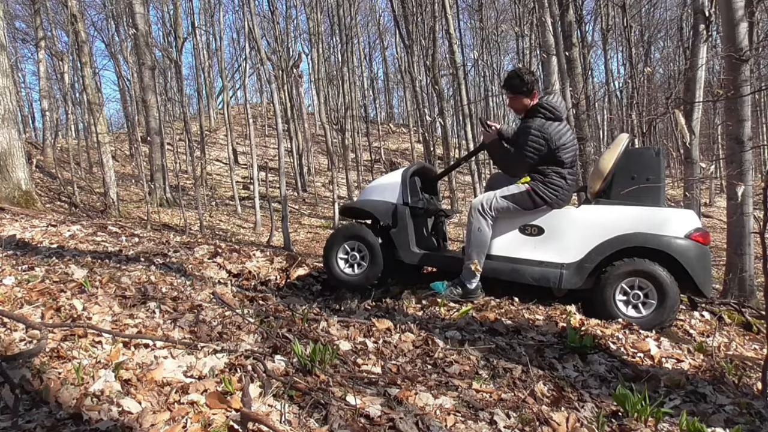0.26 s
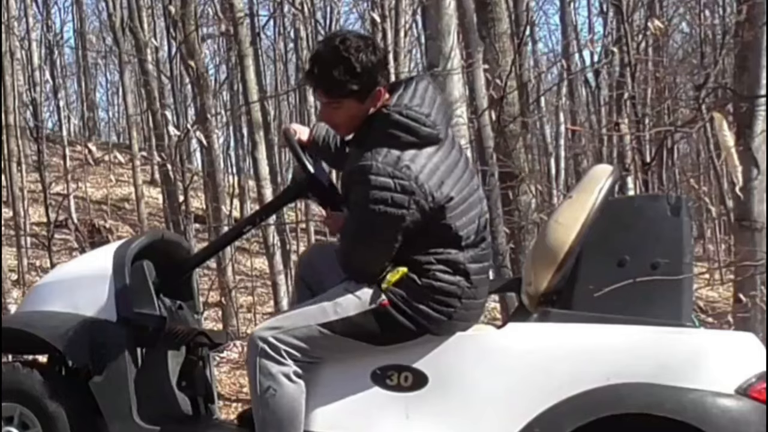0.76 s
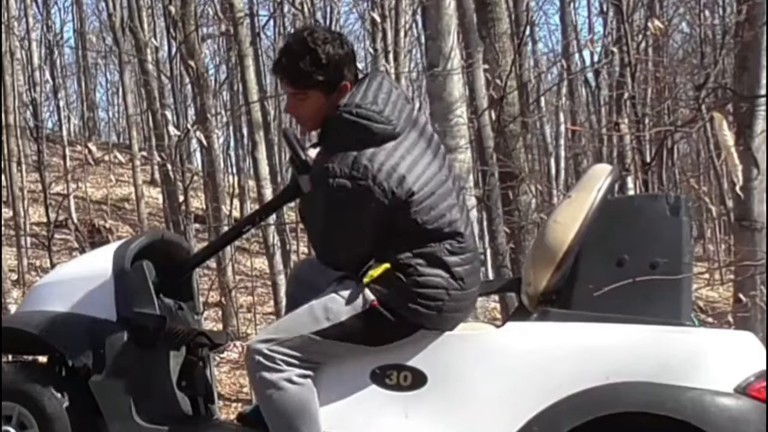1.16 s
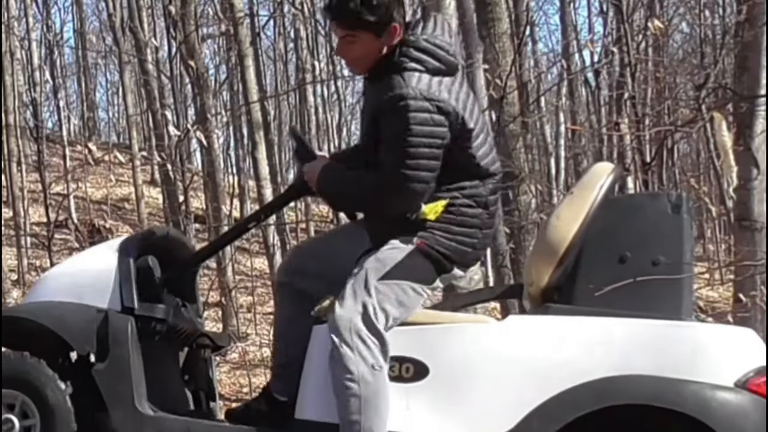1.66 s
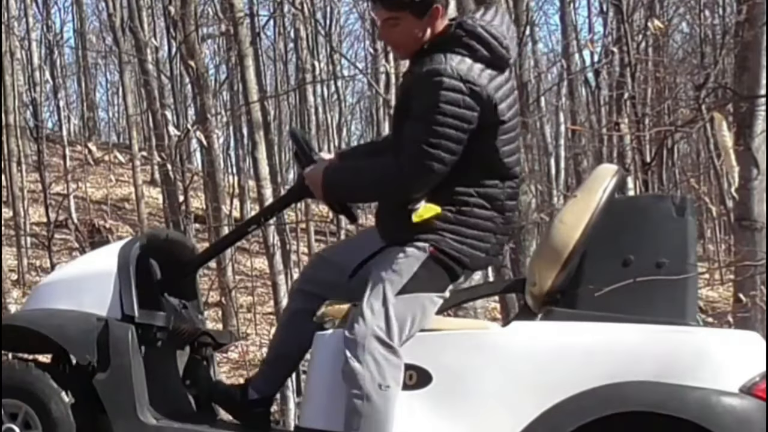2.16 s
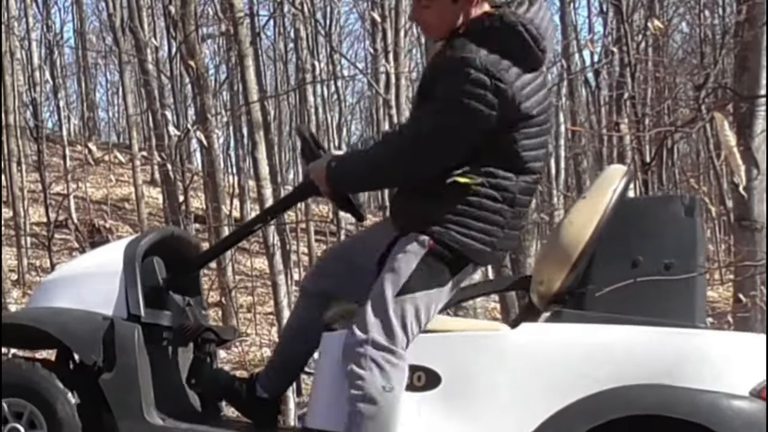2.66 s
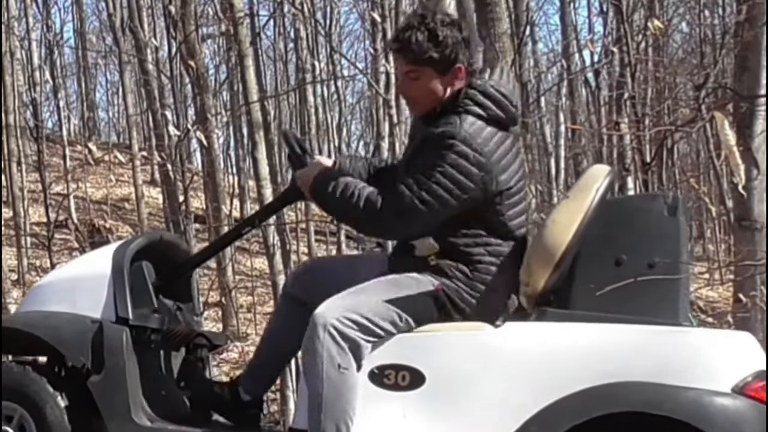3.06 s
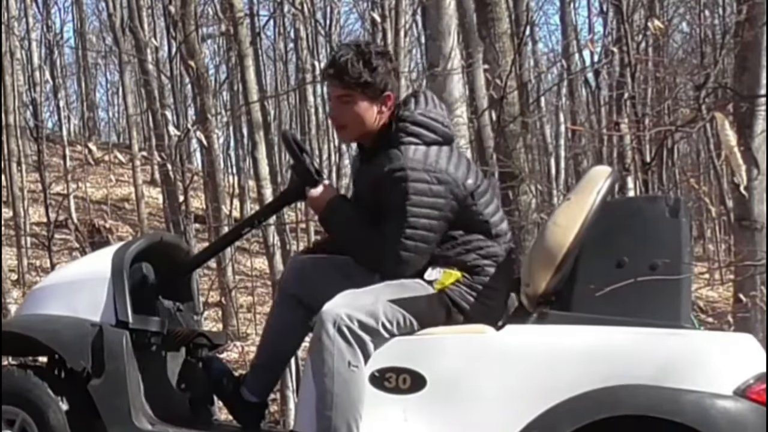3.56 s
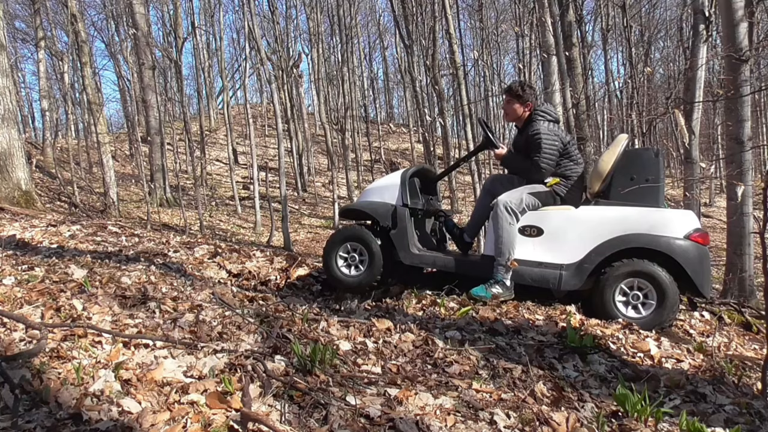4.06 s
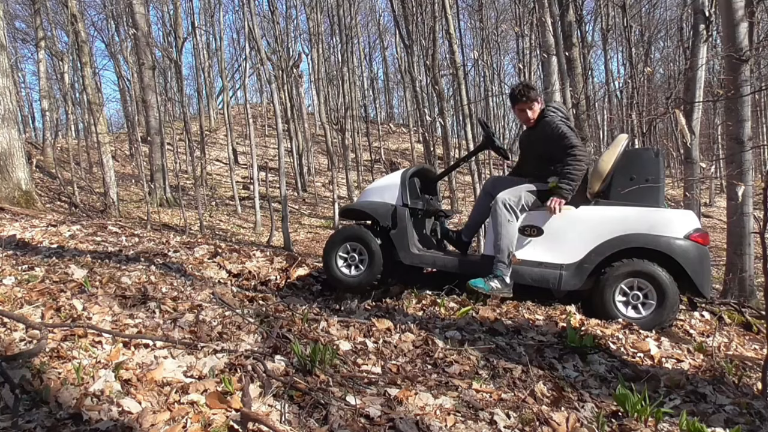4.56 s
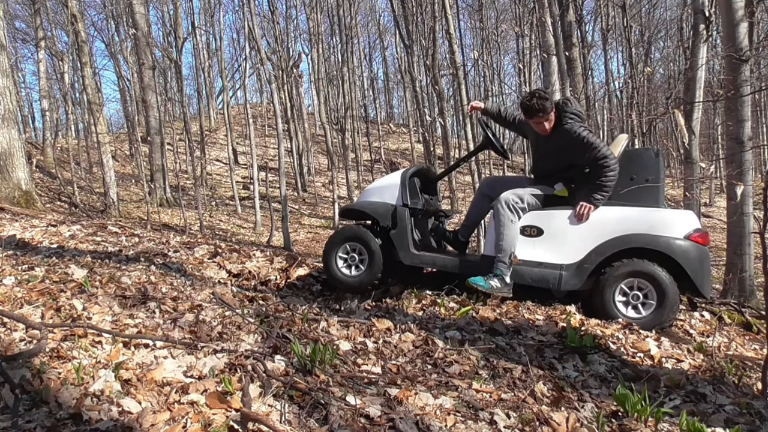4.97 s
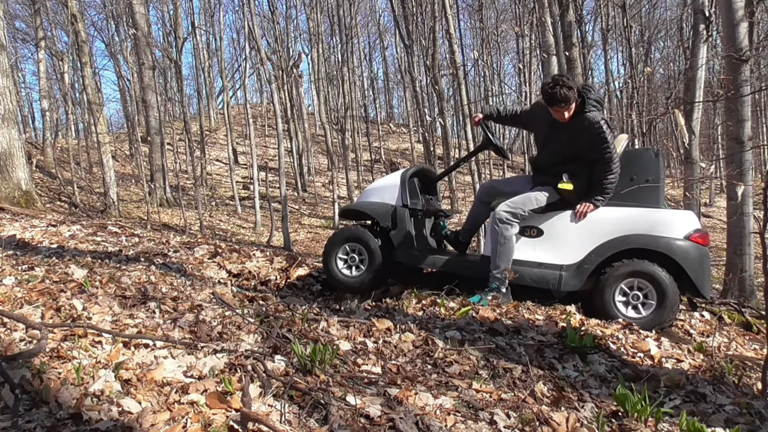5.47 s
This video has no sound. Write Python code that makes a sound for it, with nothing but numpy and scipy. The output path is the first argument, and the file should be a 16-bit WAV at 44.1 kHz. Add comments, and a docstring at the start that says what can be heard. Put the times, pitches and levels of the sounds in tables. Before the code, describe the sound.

In a quiet wood, a driver in a nylon jacket shifts on an electric cart: swishing cloth, soft knocks, a heavy triple-contact seat thud with loose panel slap, then a sharp pedal clack. More thumps, creaks and clicks follow, and a tiny hinge chirp. Finally the motor whines up into a growl with gear grind, tyre bumps and crackling dry leaves. Close, dry stereo microphone, faint hush behind.

```python
"""An electric golf cart in a quiet wood: its driver, in a nylon jacket, shifts onto the seat, then it sets off.
Cloth sounds are shaped noise under swells; thumps, slaps, clicks and clacks are decaying impacts.
A hinge chirps once, a gliding tone. The motor then whines up into a growl, a sum of shaft harmonics
shaped by housing resonances, over gear and tyre noise, rustling dry leaves and bumps of the wheels.
Beneath lie a faint hush of the wood and, later, a faint low rumble of the microphone itself."""
import sys
import numpy as np
from scipy import signal
from scipy.fft import rfft, irfft, next_fast_len
from scipy.io import wavfile

SR = 44100
rng = np.random.default_rng(int(sys.argv[2]) if len(sys.argv) > 2 else 0)


def int16_out(signal):
    """Quantize to a 16-bit WAV file."""
    q = np.round(np.clip(np.atleast_2d(signal).T, -1, 1) * 32767)
    wavfile.write(sys.argv[1], SR, q.astype(np.int16))


N = 251754
TIME = np.arange(N) / SR
AGE = TIME[:SR // 3]   # time since a blow, in seconds


def from_db(db):
    """Level: 20 dB is a factor of ten in amplitude."""
    return 10 ** (np.asarray(db) / 20)


def rms_one(x):
    """Normalization to unit effective value."""
    return x / np.sqrt(np.mean(x ** 2) + 1e-20)


def peak_one(x):
    """Normalization to unit peak."""
    return x / (np.abs(x).max() + 1e-12)


def at_hz(points, hz):
    """Interpolation of a spectrum on a log-frequency axis."""
    return np.interp(np.log(hz), np.log(np.array(points)[:, 0]), np.array(points)[:, 1])


def add(out, s, sound):
    """Superposition: mix a short sound in at time s."""
    i = max(round(s * SR), 0)
    out[..., i:i + sound.shape[-1]] += sound[..., :N - i]


def ramp(start, length):
    """Linear onset: goes from 0 to 1 over length seconds and stays there."""
    return np.clip((TIME - start) / length, 0, 1)


def drift(rate, size=N):
    """Slow random modulation: interpolated chance with about rate knots a second and rms 1."""
    knots = rng.standard_normal(N // 20)
    return rms_one(np.interp(TIME[:size] * rate + 2, np.arange(len(knots)), knots))


SWELL_DB = 20   # depth of a swell over its rise or fall time


def swells(rows):
    """Power addition of swells (s, dB, rise s, fall s), each exponential: it rises and falls evenly in dB."""
    power = np.zeros(N)
    for s, db, rise, fall in rows:
        away = np.maximum((s - TIME) / rise, (TIME - s) / fall)
        power += from_db(db - SWELL_DB * np.minimum(away, 10)) ** 2
    return np.sqrt(power)


def resonate(x, hz, width):
    """Simple resonance: a two-pole filter with gain 1 on top."""
    r = np.exp(-np.pi * width / SR)
    numerator = np.array([1, 0, -1]) * (1 - r * r) / 2
    return signal.lfilter(numerator, [1, -2 * r * np.cos(2 * np.pi * hz / SR), r * r], x)


def struck(modes, scatter_db):
    """Modal superposition: one blow rings all modes, each with a strength that depends on where it lands."""
    hz, db, t60 = np.transpose(modes)[:, :, None]
    strength = from_db(db + scatter_db * rng.standard_normal(hz.shape))
    strength = strength * (-1) ** np.arange(len(hz))[:, None]   # neighbours move in opposite phase
    return np.sum(strength * from_db(-60 * AGE / t60) * np.sin(2 * np.pi * hz * AGE), axis=0)


# Likeness of the two channels for close sounds. Each row: frequency in Hz, correlation from 0 to 1.
LIKENESS = [(30, 0.55), (70, 0.96), (200, 0.97), (1000, 0.87), (4500, 1), (7000, 0.92), (10000, 0.39),
            (15000, 1)]


def noise(spectrum, grain_db=0., likeness=LIKENESS):
    """Band synthesis of coloured stereo noise, rms 1; grain_db breaks it into tiny snaps of uneven size."""
    white = rng.standard_normal((2, 2, N)) * from_db(grain_db * drift(1400))
    out = np.zeros((2, N))
    edges = np.geomspace(22, 17000, 27)
    for k, (low, high) in enumerate(zip(edges, edges[1:])):
        hz = np.sqrt(low * high)
        if spectrum[0][0] <= hz <= spectrum[-1][0]:
            band = signal.butter(2, [low, high], "band", fs=SR, output="sos")
            mid_side = signal.sosfilt(band, white[k % 2])   # neighbouring bands are independent
            alike = np.clip(at_hz(likeness, hz), -1, 1)
            out += from_db(at_hz(spectrum, hz)) * np.sqrt([[1 + alike], [1 - alike]]) * mid_side
    mid, side = out
    return rms_one(np.array([mid + side, mid - side]))


# Colour of the wood. Each row: frequency in Hz, relative density in dB per Hz.
WOODS = [(15, -39), (25, -11), (223, -3), (285, 9), (326, -52), (560, 3.5), (1100, -6), (1520, -11.5),
         (1840, -58), (3430, -15), (4490, -20), (4870, -16.5), (6210, -26.5), (10100, -14.5), (16000, -27)]
# Channel likeness of the diffuse wood. Each row: frequency in Hz, correlation.
DIFFUSE = [(30, 0.52), (200, 0.046), (4000, 0.6), (8000, 0.31)]


def woods(level_db=-58.5):
    """Diffuse field: steady noise whose channels are only partly correlated."""
    return from_db(level_db) * noise(WOODS, likeness=DIFFUSE)


# Strokes of the sleeve over the jacket.
# Each row: time of fastest slide in seconds, level in dB before flutter, rise in seconds, fall in seconds.
STROKES = [(0.12, -40, 0.073, 0.21), (0.56, -59.5, 0.72, 0.3), (0.695, -47, 0.12, 0.037),
           (0.935, -47, 0.14, 0.074), (1.16, -47.5, 0.08, 0.16), (1.35, -42, 0.22, 0.1),
           (1.65, -51, 0.44, 0.13), (1.83, -44, 0.22, 0.15), (2.03, -54, 0.71, 0.25),
           (2.19, -36.5, 0.16, 0.12), (2.42, -51.5, 0.96, 0.99), (2.69, -52, 0.079, 0.2),
           (2.905, -39, 0.14, 0.13), (3.17, -51.5, 0.46, 0.22), (3.37, -50, 0.55, 0.16),
           (3.62, -64, 0.14, 0.23), (3.937, -56, 0.059, 0.049)]
# Shifts of weight that drag cloth over the cushion.
# Each row: time of strongest drag in seconds, level in dB before flutter, rise in seconds, fall in seconds.
SHIFTS = [(0.0, -39, 0.51, 0.31), (0.945, -47.5, 0.081, 0.16), (1.352, -47, 0.03, 0.067),
          (1.66, -42, 0.31, 0.52), (2.2, -34.5, 0.22, 0.26), (2.82, -43.5, 0.41, 0.18),
          (3.25, -42, 0.78, 0.46), (4.42, -49, 0.081, 0.13)]
# Colours of ribbed nylon and of the cushion. Each row: frequency in Hz, relative density in dB per Hz.
NYLON = [(530, -6), (900, -5), (1100, -5), (1290, -5.5), (1680, -14.5), (2020, -9), (2760, -13.5),
         (3770, -10.5), (4200, -8), (7140, -8.5), (11400, -1), (13700, -34.5), (16000, -58)]
CUSHION = [(29, -63), (50, -12), (75, -9), (108, -4.5), (172, 7), (246, -0.5), (724, -8.5), (1000, -16),
           (1320, -16), (3000, -28.5), (3900, -43), (6600, -120)]
SITTING_DB, SETTLE_DB_PER_S = -57.5, -0.4   # the steady rub of cloth, fading as he settles


def jacket(flutter_db=1.8):
    """Sliding friction: nylon hisses as its ribs slide over each other; the cushion adds a dull rub."""
    dragging = np.hypot(swells(SHIFTS), from_db(SITTING_DB + SETTLE_DB_PER_S * TIME))
    swish = swells(STROKES) * from_db(flutter_db * drift(90)) * noise(NYLON, grain_db=1.5)
    rub = dragging * from_db(drift(60)) * noise(CUSHION, grain_db=3.5)
    return swish * from_db([[-.8], [.8]]) + rub   # the swish leans to the right


# Short hissing scrapes and brushes: first a zip-like scrape, then cloth, last a shoe scuff.
# Each row: time in seconds, level in dB, rise in seconds, fall in seconds, centre of the hiss in Hz.
SCRAPES = [(0.016, -43, 0.058, 0.027, 3800), (3.915, -57, 0.01, 0.038, 4840),
           (4.355, -61, 0.02, 0.033, 4860), (4.453, -58, 0.036, 0.038, 4800),
           (4.55, -66, 0.01, 0.037, 4900), (4.71, -59, 0.2, 0.14, 4700)]


def scrapes(width_share=0.67):
    """Broad resonance of friction noise: short hisses of a zip-like scrape, cloth and a shoe scuff."""
    out = np.zeros(N)
    for *swell, hz in SCRAPES:
        width = width_share * hz
        hiss = resonate(resonate(rng.standard_normal(N), hz, width), hz, width)
        out += swells([swell]) * rms_one(hiss)
    return out


# Loose panels slapping. Each row: start in seconds, level in dB before the trim, ring pitch in Hz.
SLAPS = [(0.021, -29, 430), (0.807, -43, 706), (1.514, -50, 820), (1.537, -38, 870), (1.598, -33, 900),
         (1.674, -23.5, 760), (1.68, -17.5, 920), (1.686, -22, 526), (2.238, -23, 755), (2.245, -16, 567),
         (2.582, -38, 625), (2.745, -41, 900), (2.794, -43, 920), (2.95, -46, 700), (3.119, -41, 1350),
         (3.161, -29, 615), (4.441, -50, 1780), (4.451, -46, 750)]


def slaps(trim_db=1.5, t60=0.047, width_hz=480, taps_per_s=650, buzz_db=-22):
    """Repeated impact: a loose panel hits its frame, then chatters against it in uneven, dying taps."""
    out = np.zeros(N)
    for s, db, hz in SLAPS:
        taps = rng.random(len(AGE)) < taps_per_s / SR
        chatter = rng.standard_normal(len(AGE)) * (taps + from_db(buzz_db)) * from_db(-60 * AGE / t60)
        chatter[0] = 2   # the first hit
        ring = resonate(resonate(chatter, hz, width_hz), hz, 2 * width_hz)
        add(out, s, from_db(db + trim_db) * peak_one(ring))
    return out


# Single knocks of hands and feet on seat, floor and chassis.
# Each row: start in seconds, blow level in dB, settled thud pitch in Hz, panel clatter level in dB.
KNOCKS = [(0.064, -32, 197, -58), (0.21, -39.5, 221, -65), (0.574, -31.5, 253, -63), (0.594, -42, 176, -63),
          (0.804, -38.5, 280, -55), (0.984, -43, 297, -54.5), (1.093, -36, 289, -47.5),
          (1.408, -35.5, 197, -45.5), (1.512, -38, 303, -42), (1.531, -28.5, 217, -46),
          (1.563, -30, 197, -62), (1.587, -32, 198, -43), (1.608, -27, 224, -39.5),
          (1.671, -22, 270, -28.5), (1.711, -27, 240, -52), (1.723, -30, 228, -68),
          (2.029, -35.5, 200, -44.5), (2.155, -34, 186, -34), (2.24, -18, 182, -23),
          (2.585, -27.5, 200.6, -38.5), (2.709, -24.5, 297, -38.5), (2.743, -32, 240, -42.5),
          (2.792, -27, 187, -36), (2.922, -33.5, 196, -41.5), (2.951, -30.5, 292, -40.5),
          (2.963, -29, 299, -42.5), (3.119, -31.5, 210, -41), (3.207, -32.5, 210, -66),
          (3.265, -37, 261, -43), (3.293, -31, 227, -41), (3.953, -35, 182, -60), (4.293, -42, 220, -65),
          (4.353, -40, 236, -57), (4.44, -35, 270, -45.5), (4.467, -33, 255, -53), (4.55, -41.5, 198, -70),
          (5.165, -39, 170, -44), (5.347, -26, 140, -38.5), (5.511, -27, 139, -38.5)]
# The driver's weight lands in three contacts: touch, full load and rebound.
# Each row: time of full load in seconds, blow level in dB, settled thud pitch in Hz, panel clatter level in dB,
# lead of the touch in seconds, delay of the rebound in seconds, rebound level in dB re the full load.
LANDINGS = [(0.04, -20.5, 217.5, -40, 0.018, 0.0135, -4), (1.6821, -10, 196, -32, 0.0215, 0.016, -3.5),
            (2.847, -20.5, 210.6, -47, 0.0172, 0.014, -22), (3.167, -20, 193, -39, 0.00713, 0.0121, -3.5),
            (3.924, -25, 188.4, -43.5, 0.014, 0.0096, 0.5)]
TOUCH_DB, TOUCH_PITCH, REBOUND_PITCH, REBOUND_CLATTER_DB = -4.5, 1.19, 1.055, -8   # re the full load
# The wheels drop over uneven ground. Each row: start in seconds, blow level in dB.
BUMPS = [(4.891, -35), (5.117, -37), (5.166, -34.5), (5.237, -41), (5.32, -29.5), (5.403, -28.5),
         (5.474, -36), (5.567, -28), (5.626, -27)]
BUMP_HZ, BUMP_CLATTER_DB = 98.5, -22.5   # settled pitch of a tyre's thud; clatter re its blow level


def blows():
    """Impact sequence of knocks, landings and bumps: (s, blow dB, thud pitch Hz, clatter dB)."""
    rows = list(KNOCKS)
    for s, db, hz, clatter_db, lead, gap, rebound_db in LANDINGS:
        touch = (s - lead, db + TOUCH_DB, hz * TOUCH_PITCH, clatter_db)
        full_load = (s, db, hz, clatter_db)
        rebound = (s + gap, db + rebound_db, hz * REBOUND_PITCH, clatter_db + REBOUND_CLATTER_DB)
        rows += [touch, full_load, rebound]
    return rows + [(s, db, BUMP_HZ, db + BUMP_CLATTER_DB) for s, db in BUMPS]


# Modes of seat and body shell, then of plastic panels.
# Each row: frequency in Hz, relative level in dB, 60 dB decay time in seconds.
BODY = [(84.5, 2.5, 0.18), (133.2, 5.5, 0.15), (190.5, 5, 0.13), (217.2, 7.5, 0.09), (297, -13.5, 0.082),
        (341.5, -17, 0.19), (408, -9, 0.084)]
PANELS = [(520, -6.5, 0.077), (591, 7.5, 0.052), (631, 1, 0.079), (747, 2.5, 0.022), (899, 4, 0.061),
          (874, -13.5, 0.15), (1280, -5, 0.018), (1438, 10.5, 0.07), (1975, 13, 0.057), (2240, 13, 0.083)]
# Colour of gear noise, also of the rattle after a blow. Each row: frequency in Hz, relative density in dB per Hz.
GEARS = [(150, -38), (250, 2.5), (624, -1.5), (776, 4), (927, -10), (1360, -4.5), (1840, -58), (3000, -17),
         (3900, -31), (6600, -120)]


def knocks(thud_t60=0.086, contact_s=0.00051, sag=0.34, sag_s=0.0029, thud_db=-1.0, body_db=-6.5,
           rattle_t60=0.1, weight_db=-23.5, weight_hz=100, weight_t60=0.02):
    """Padded impact: a brief thud sinks in pitch as the contact spreads, and shell and panels ring."""
    out, shaken = np.zeros((2, N)), np.zeros(N)
    rattle = noise(GEARS, grain_db=1.0)
    contact = 1 - np.exp(-AGE / contact_s)
    # the suspension gives
    weight = peak_one(contact * from_db(-60 * AGE / weight_t60) * np.sin(2 * np.pi * weight_hz * AGE))
    for s, db, hz, clatter_db in blows():
        # the contact is never even
        rocking = .13 * np.interp(AGE * 300, np.arange(100), rng.standard_normal(100))
        turns = np.cumsum(hz * (1 + sag * np.exp(-AGE / sag_s) + rocking)) / SR
        thud = peak_one(contact * from_db(-60 * AGE / thud_t60) * np.sin(2 * np.pi * turns))
        # modes near the thud pitch are favoured
        body = peak_one(resonate(struck(BODY, scatter_db=3.), hz, width=.9 * hz))
        # only strong clatter reaches the upper panel modes
        reach_hz = np.interp(clatter_db, [-36, -25], [1000, 3500])
        dull = signal.butter(4, reach_hz, fs=SR, output="sos")
        panels = peak_one(signal.sosfilt(dull, struck(PANELS, scatter_db=4.0)))
        low = from_db(thud_db) * thud + from_db(body_db) * body + from_db(weight_db) * weight
        add(out, s, from_db(db) * low + from_db(clatter_db) * panels)
        add(shaken, s, from_db(clatter_db - 60 * AGE / rattle_t60) * peak_one(contact))
    small_body = signal.butter(4, 68, "high", fs=SR, output="sos")   # the cart radiates no deep bass
    return signal.sosfilt(small_body, out) + shaken * rattle


# Something slides on the seat. Each row: time in seconds, level in dB, rise in seconds, fall in seconds.
RUBS = [(0.155, -49, 0.085, 0.17), (0.32, -59, 0.17, 0.1)]


def rubs(centre_hz=530, width_hz=190):
    """Resonance under friction: fine rubbing wakes one hollow resonance of the seat."""
    friction = rng.standard_normal(N)
    hollow = resonate(resonate(friction, centre_hz, width_hz), centre_hz, 2 * width_hz)
    return swells(RUBS) * rms_one(hollow)


# Hard contacts of pedal, latch, zip and twigs.
# Each row: start in seconds, level in dB before the trim, 60 dB decay time of the crack in seconds.
CLICKS = [(0.954, -32.5, 0.025), (1.6605, -30.5, 0.06), (1.6695, -26.5, 0.11), (1.6806, -13, 0.016),
          (1.71, -32, 0.022), (1.756, -33, 0.015), (2.111, -28, 0.055), (2.2361, -12, 0.039),
          (2.5703, -32, 0.014), (3.152, -39, 0.046), (3.2128, -31.5, 0.014), (3.263, -30, 0.017),
          (3.364, -31.5, 0.01), (3.415, -33.5, 0.063), (3.517, -46, 0.08), (3.7761, -37, 0.025),
          (5.625, -28, 0.037), (5.665, -39, 0.03)]
# Colour of a hard crack. Each row: frequency in Hz, relative density in dB per Hz.
CRACK = [(710, -20), (1200, 0.5), (2000, -15), (2790, -12), (4170, -5), (7250, -11.5), (8080, -0.5),
         (8820, -6.5), (11200, -7.5), (16000, -30)]
# Channel likeness of scattered sound. Each row: frequency in Hz, correlation.
SCATTERED = [(1000, 1), (4000, 0.99), (8000, 0.55), (15000, .3)]


def clicks(trim_db=-8.0, tail_db=-21.5, tail_t60=0.22, rise_s=0.000077):
    """Hard impact: a short contact gives a bright crack and a faint scatter from the cart's shell."""
    force = np.zeros(N)
    for s, db, t60 in CLICKS:
        fade = from_db(-60 * AGE / t60) + from_db(tail_db - 60 * AGE / tail_t60)
        add(force, s, from_db(db + trim_db) * fade * (1 - np.exp(-AGE / rise_s)))
    return force * noise(CRACK, grain_db=-0.5, likeness=SCATTERED)


# The seat creaking under shifting weight. Each row: start in seconds, end in seconds, peak level in dB.
CREAKS = [(1.515, 1.663, -34.5), (2.164, 2.24, -44), (2.727, 2.878, -33.5), (3.275, 3.34, -36.5),
          (3.925, 3.996, -43), (4.291, 4.46, -43.5), (4.444, 4.528, -40.5)]


def creaks(slips_per_s=110, centre_hz=260, width_hz=110, ease_db=-8.0):
    """Stick-slip: cloth slips in steps on the seat, each nudging the cushion, more gently as weight settles."""
    out = np.zeros(N)
    for start, end, db in CREAKS:
        slips = np.zeros(len(AGE))
        at = np.cumsum(rng.uniform(0.6, 1.8, size=40)) / slips_per_s   # uneven spacing
        at = at[at < min(end - start, AGE[-1])]
        uneven_db = 2 * rng.standard_normal(40)[:len(at)]
        slips[(at * SR).astype(int)] = from_db(uneven_db + ease_db * at / (end - start))
        nudges = resonate(resonate(slips, centre_hz, width_hz), centre_hz, 3 * width_hz)
        add(out, start, from_db(db) * peak_one(nudges))
    return out


# The pedal clacks and latches.
# Each row: start in seconds, level of the ring in dB, highest pitch that the contact wakes in Hz (a soft limit).
CLACKS = [(2.238, -26, 2000), (2.831, -32, 1700), (3.1165, -29, 1590), (3.263, -34.5, 4200),
          (3.403, -39, 13000), (3.4125, -27, 13000), (3.4235, -34, 13000)]
# Modes of the pedal. Each row: frequency in Hz, relative level in dB, 60 dB decay time in seconds.
PEDAL = [(1140, -6, 0.022), (1417, 0.5, 0.038), (1890, -9, 0.019), (3470, -2, 0.024), (3850, -9, 0.018),
         (5280, -9, 0.0098), (8950, 3, 0.016), (10000, 6, 0.019), (11900, 4, 0.016)]


def pedal(scatter_db=6.5, crack_db=-4.5, crack_t60=0.026):
    """Impact bandwidth: a clack is a crack and a short ring; a harder contact wakes higher modes."""
    out = np.zeros(N)
    for s, db, reach_hz in CLACKS:
        modes = [(hz, mode_db - 10 * np.log10(1 + (hz / reach_hz) ** 6), t60) for hz, mode_db, t60 in PEDAL]
        band = signal.butter(2, [700, min(1.2 * reach_hz, 16000)], "band", fs=SR, output="sos")
        crack = signal.sosfilt(band, rng.standard_normal(len(AGE)) * from_db(-60 * AGE / crack_t60))
        ring = peak_one(struck(modes, scatter_db))
        add(out, s, from_db(db) * (ring + from_db(crack_db) * peak_one(crack)))
    return out


# Faint low rumble of the microphone itself.
# Each row: time in seconds, level in dB, rise in seconds, fall in seconds.
SELF_RUMBLE = [(4.15, -57, 1.0, 1.0), (5.65, -58, 1, 0.5)]
# Colour of this rumble. Each row: frequency in Hz, relative density in dB per Hz.
SELF_RUMBLE_COLOUR = [(25, -5), (70, -7), (110, 1), (200, -30)]
# Channel likeness of this rumble: none. Each row: frequency in Hz, correlation.
UNRELATED = [(30, 0), (200, 0)]


def microphone_rumble():
    """Self-noise: faint low rumble of the microphone itself, uncorrelated between the channels."""
    return swells(SELF_RUMBLE) * noise(SELF_RUMBLE_COLOUR, likeness=UNRELATED)


# the chirp glides up to its loudest moment, then lets go
CHIRP_S, CHIRP_DB, CHIRP_RISE_S, CHIRP_FALL_S = 4.423, -30, 0.0061, 0.0042
CHIRP_FROM_HZ, CHIRP_TO_HZ, CHIRP_GLIDE_S = 10000, 11320, 0.011


def hinge(ring_db=-37.5, ring_t60=0.068, upper_hz=12900, upper_s=4.425, upper_db=-41.0, upper_t60=0.042):
    """Stick-slip of dry metal: a tiny rising chirp that rings on after release, with a higher mode."""
    glide = ramp(CHIRP_S - CHIRP_GLIDE_S, CHIRP_GLIDE_S)
    hz = CHIRP_FROM_HZ + (CHIRP_TO_HZ - CHIRP_FROM_HZ) * glide
    gain = swells([(CHIRP_S, CHIRP_DB, CHIRP_RISE_S, CHIRP_FALL_S)])
    add(gain, CHIRP_S, from_db(ring_db - 60 * AGE / ring_t60))
    out = gain * np.sin(2 * np.pi * np.cumsum(hz * (1 + 0.0067 * drift(476))) / SR)
    add(out, upper_s, from_db(upper_db - 60 * AGE / upper_t60) * np.sin(2 * np.pi * upper_hz * AGE))
    return out


MOTOR_START_S = 4.73
# Dry leaves crushed under shoe and tyres.
# Each row: time in seconds, level in dB before the trim, fall in seconds.
CRUNCHES = [(4.7, -59, 0.13), (5.15, -50.5, 0.13), (5.344, -47, 0.085), (5.52, -47.5, 0.15),
            (5.631, -36, 0.053)]
# Colour of dry leaves. Each row: frequency in Hz, relative density in dB per Hz.
LEAF = [(1650, 5), (2800, -8.5), (3410, -1), (6770, -1.5), (7170, -7), (7890, 1), (11300, -0.5),
        (13000, -12), (16000, -28)]
LEAF_START_S, LEAF_DB, LEAF_DB_PER_S = 4.42, -63, 6.5   # growing rustle, level before the trim
SNAPS_PER_S, SNAP_DB, SNAP_T60 = 23, 4, 0.015   # leaf stems break; level re the rustle, decay in s
CRUNCH_RISE_SHARE = 0.45   # a crunch builds in this share of the time that it takes to fall


def leaves(trim_db=-4.0, flutter_db=2.0, onset_s=0.19):
    """Random fracture: dry leaves rustle, stems snap by chance once the motor runs, and heaps are crushed."""
    rustle = ramp(LEAF_START_S, onset_s) * from_db(LEAF_DB + LEAF_DB_PER_S * (TIME - LEAF_START_S))
    breaks = (rng.random(N) < SNAPS_PER_S / SR) * from_db(SNAP_DB) * (TIME > MOTOR_START_S)
    decay = from_db(-60 / (SNAP_T60 * SR))   # per sample
    snaps = signal.lfilter([1], [1, -decay], breaks + 1e-18)
    crushed = swells([(s, db, CRUNCH_RISE_SHARE * fall, fall) for s, db, fall in CRUNCHES])
    gain = np.hypot(rustle * (1 + snaps), crushed) * from_db(trim_db + flutter_db * drift(70))
    return gain * noise(LEAF, grain_db=0.5)


# Resonances of the motor and gear housing. Each row: frequency in Hz, width in Hz, relative level in dB.
HOUSING = [(293.6, 63, 5), (400, 19, 6), (577, 36, 1.5), (705, 75, 2.5), (760, 90, 3), (1117, 88, 1.5),
           (1362, 29, 5.5), (1500, 88, 0.5), (1690, 48, -15), (2100, 250, -1.5), (2514, 53, -7.5),
           (3520, 450, 0), (5060, 400, -0.5)]
# Speed of the motor shaft. Each row: time in seconds, turns per second before the waver.
SHAFT = [(4.72, 22), (4.805, 27), (4.85, 48), (4.89, 72), (4.96, 103), (5.05, 95), (5.26, 98), (5.36, 97),
         (5.44, 101), (5.58, 100), (5.7, 95)]
BRIGHTEN_S, BRIGHTEN_HZ = .45, (280, 2000)   # the teeth bite harder as load builds and wake higher pitches
GROWL_DB = -65.5   # each shaft harmonic, before housing, slow-speed loss and throb
PINION_TEETH, IDLER_TEETH, WHEEL_TEETH = 8, 12, 14   # meshes per turn
PINION_DB, OCTAVE_DB, IDLER_DB, WHEEL_DB = 8, 5, 6.5, 12   # their whines re the growl
DIRECT = .8   # gain of the whine that bypasses the housing
SURGE_DB, SURGE_END_S, SURGE_FALL_S = 8.5, 4.86, 0.13   # the pinion is louder while the motor pulls away
SING_FROM_S, SING_RISE_S = 5.02, 0.034   # the gear wheel sings once the drive is loaded
LABOUR_DB, LABOUR_PER_S = 2.2, 14   # the whole whine surges and slackens at random
PULSING = .4   # depth of the throb that each turn of the shaft gives the whine
WHINE_WAVER, WHINE_JITTER = .011, .024   # slow and fast unsteadiness of the pitch, as shares of it
ORDER_FLUTTER_DB, ORDER_FLUTTER_PER_S = 3.2, 40   # each harmonic comes and goes on its own


def motor(shaft_hz, count=18):
    """Source and filter: shaft harmonics, tooth orders foremost, flare in the housing resonances they cross."""
    grid = np.arange(0, SR / 8, 2)
    housing_power = sum(from_db(db) ** 2 / (1 + (2 * (grid - f) / width) ** 2) for f, width, db in HOUSING)
    response = np.hypot(np.sqrt(housing_power), DIRECT)
    running = TIME > MOTOR_START_S
    # at low speed the gear teeth stand out
    slow_db = 30 * np.log10(shaft_hz[running] / SHAFT[-1][1])
    surge_db = SURGE_DB * (1 - ramp(SURGE_END_S, SURGE_FALL_S)[running])
    loaded = ramp(SING_FROM_S, SING_RISE_S)[running]
    teeth_db = {PINION_TEETH: PINION_DB + surge_db,
                2 * PINION_TEETH: OCTAVE_DB * (1 - loaded),
                IDLER_TEETH: IDLER_DB * loaded,
                WHEEL_TEETH: WHEEL_DB * loaded}
    reach_hz = np.interp(ramp(MOTOR_START_S, BRIGHTEN_S)[running], [0, 1], BRIGHTEN_HZ)
    throb = 1 + PULSING * np.sin(2 * np.pi * np.cumsum(shaft_hz) / SR)
    out = np.zeros(N)
    for k in range(1, count + 1):
        hz = k * shaft_hz[running]
        phase = 2 * np.pi * np.cumsum(hz * (1 + WHINE_JITTER * drift(400, size=len(hz)))) / SR
        flutter_db = ORDER_FLUTTER_DB * drift(ORDER_FLUTTER_PER_S, size=len(hz))
        level_db = GROWL_DB + teeth_db.get(k, slow_db) + flutter_db
        dulling = np.hypot(1, (hz / reach_hz) ** 3)
        out[running] += from_db(level_db) * np.interp(hz, grid, response) * np.sin(phase) / dulling
    return out * throb * from_db(LABOUR_DB * drift(LABOUR_PER_S))


# The drive strains as the wheels climb a hump. Each row: time in seconds,
# gear noise level in dB before its trims, rise in seconds, fall in seconds.
STRAINS = [(4.955, -43.5, 0.05, 0.045), (5.655, -36, 0.064, 0.12)]
# Colour of the tyre rumble. Each row: frequency in Hz, relative density in dB per Hz.
TYRES = [(50, -5), (70, -22), (100, -5.5), (160, -6), (240, -4.5), (400, -23)]
ENGAGE_S = 0.043   # the power comes on over this time
GEAR_DB, GEAR_DB_PER_S = -49.5, 6.5   # gear noise grows with time, level before its trims
GEAR_SPEED_LAW = 1.5   # and with this power of the speed
RUMBLE_DB, RUMBLE_SPEED_LAW = -50.5, 0.8   # level at running speed
SHAKE_DB, SHAKE_PER_S = 1.5, 46   # the gear noise flutters


def drive(housing_db=-6.0, mesh_db=-9.5, tyre_strain_db=-1.5, grind_db=1.0):
    """Forced vibration: the motor whines, gears grind once a turn and excite the housing, tyres rumble."""
    shaft_hz = np.interp(TIME, *np.transpose(SHAFT)) * (1 + WHINE_WAVER * drift(18))
    speed = shaft_hz / SHAFT[-1][1]   # share of the running speed
    growth = from_db(GEAR_DB + GEAR_DB_PER_S * (TIME - MOTOR_START_S))
    load = speed ** GEAR_SPEED_LAW * np.sqrt(ramp(MOTOR_START_S, BRIGHTEN_S)) * growth
    # the stiff housing passes little between its resonances
    rings = np.zeros(N)
    for f, width, db in HOUSING:
        ring = resonate(resonate(rng.standard_normal(N), f, width), f, 4 * width)
        rings += from_db(db) * rms_one(ring)
    strain = swells(STRAINS)
    once_a_turn = np.sin(2 * np.pi * np.cumsum(shaft_hz) / SR)
    grinding = from_db(SHAKE_DB * drift(SHAKE_PER_S) + grind_db * once_a_turn)
    gear_noise = from_db(housing_db) * rms_one(rings) + from_db(mesh_db) * noise(GEARS, grain_db=1.0)
    gears = np.hypot(load, strain) * grinding * gear_noise
    rumble = speed ** RUMBLE_SPEED_LAW * from_db(RUMBLE_DB)
    tyres = np.hypot(rumble, from_db(tyre_strain_db) * strain) * noise(TYRES)
    return ramp(MOTOR_START_S, ENGAGE_S) * (motor(shaft_hz) + gears + tyres)


# Small ticks of metal in the drive. Each row: start in seconds, level in dB.
TICKS = [(4.873, -48), (5.122, -47), (5.402, -47.5)]
# Modes of the metal link. Each row: frequency in Hz, relative level in dB, 60 dB decay time in seconds.
LINKAGE = [(2500, -2, 0.09), (3410, -6, 0.11), (3500, 2, 0.11), (5120, 0, 0.068)]
RATTLE_PER_S, RATTLE_DB = 9, -59   # lighter taps at random from the first tick on


def ticks(scatter_db=3.5):
    """Modal ringing: a metal link in the drive is tapped, and rattles lightly in between."""
    out = np.zeros(N)
    light = TIME[(rng.random(N) < RATTLE_PER_S / SR) & (TIME > TICKS[0][0])]
    for s, db in list(TICKS) + [(s, RATTLE_DB) for s in light]:
        add(out, s, from_db(db) * peak_one(struck(LINKAGE, scatter_db)))
    return out


def scene():
    """Superposition of cart and driver over the faint hush of the wood."""
    hard = (clicks() + slaps() + pedal()) * from_db([[-.5], [.5]])   # a little to the right
    moving = (drive() + leaves() + ticks()) * from_db([[-.6], [.6]])
    friction = jacket() + scrapes() + rubs() + creaks()
    return woods() + friction + knocks() + hard + microphone_rumble() + hinge() + moving


def record(dry, lag_s=.000011, cutoff_hz=15800):
    """Time difference and band limits: the left port lags a hair; deep bass and the top are cut."""
    size = next_fast_len(N + SR // 100)
    delay = np.exp(-2j * np.pi * np.fft.rfftfreq(size, 1 / SR) * lag_s)
    left = irfft(rfft(dry[0], size) * delay, size)[:N]
    thin = signal.sosfilt(signal.butter(2, 32, "high", fs=SR, output="sos"), [left, dry[1]])
    return signal.sosfilt(signal.ellip(10, .1, 80, cutoff_hz, fs=SR, output="sos"), thin)


dry = scene()
out = record(dry)
int16_out(out)
```